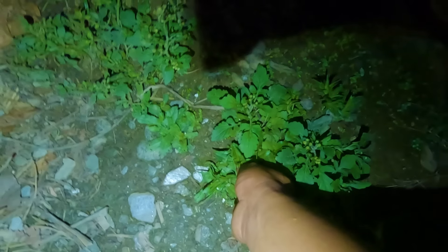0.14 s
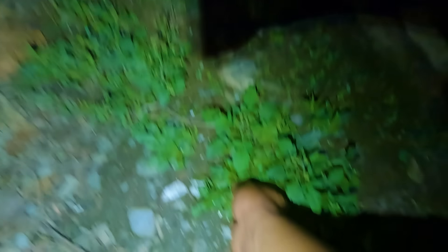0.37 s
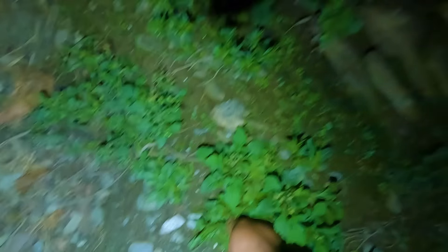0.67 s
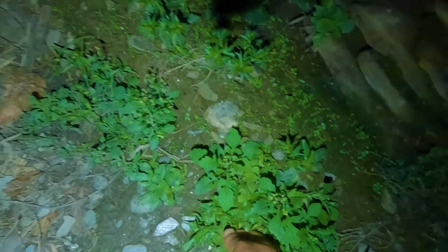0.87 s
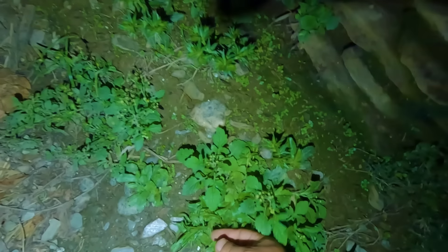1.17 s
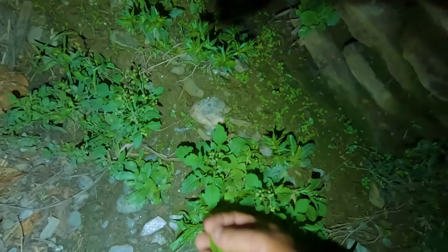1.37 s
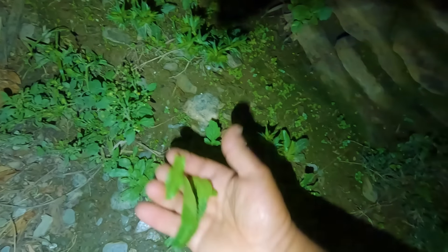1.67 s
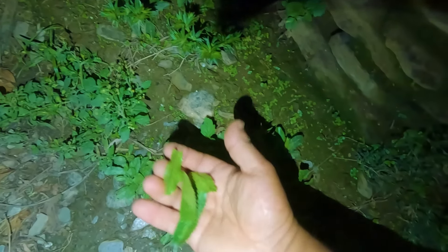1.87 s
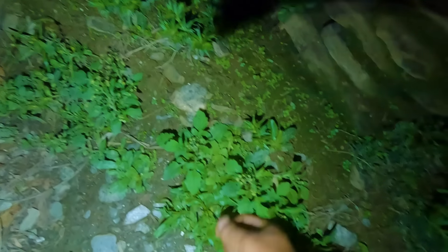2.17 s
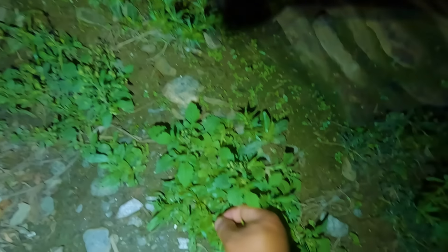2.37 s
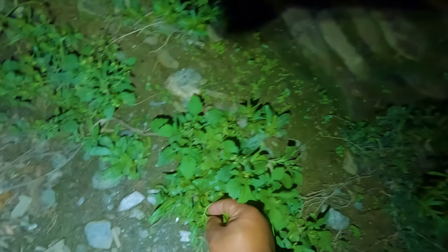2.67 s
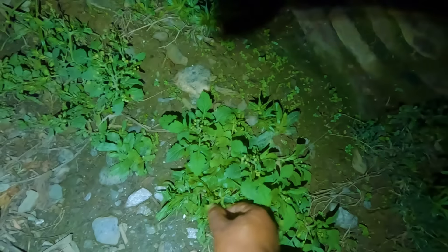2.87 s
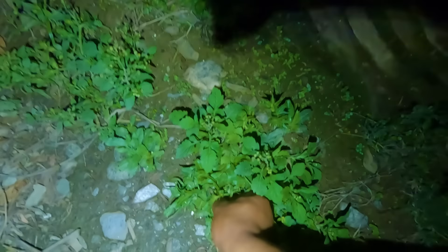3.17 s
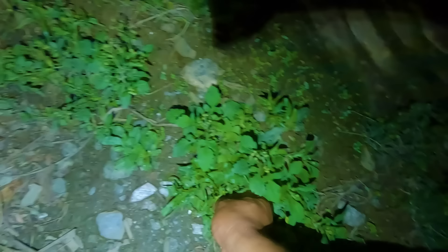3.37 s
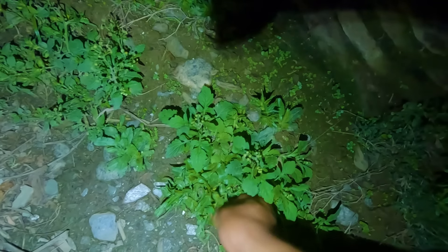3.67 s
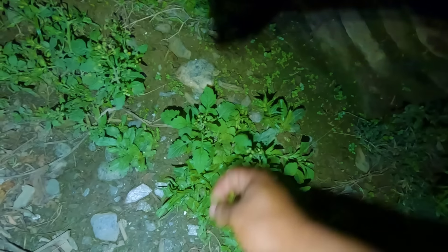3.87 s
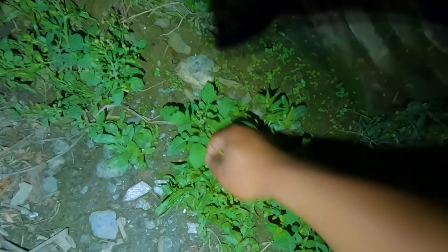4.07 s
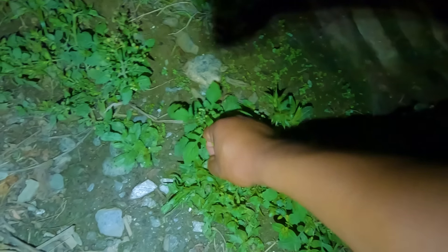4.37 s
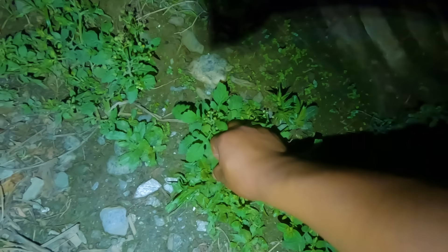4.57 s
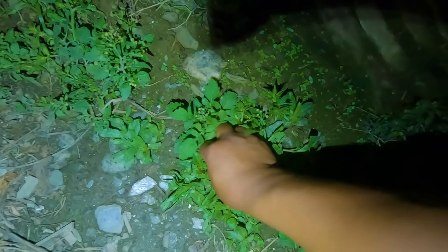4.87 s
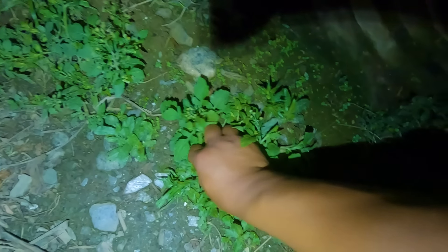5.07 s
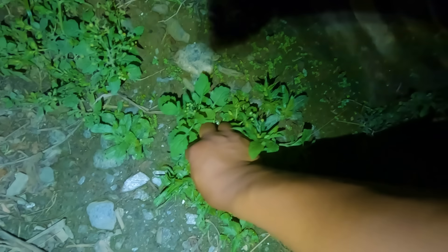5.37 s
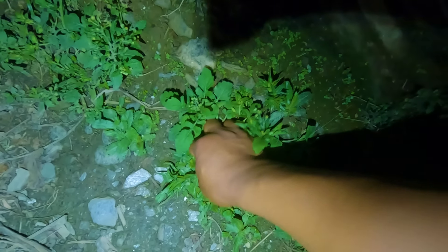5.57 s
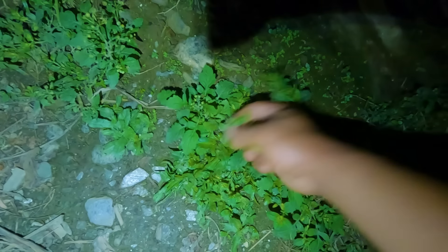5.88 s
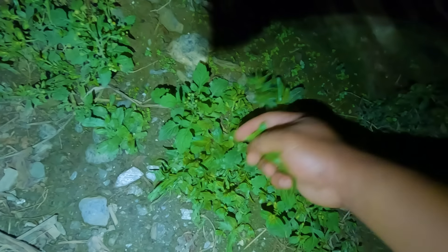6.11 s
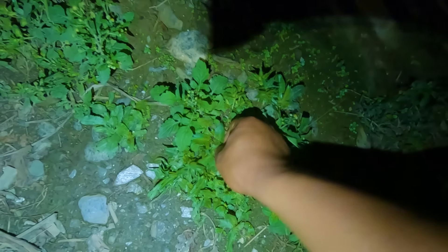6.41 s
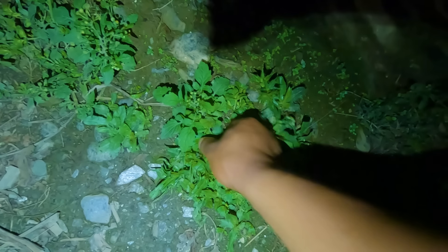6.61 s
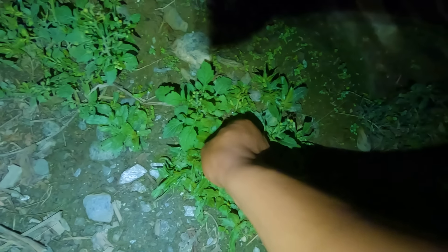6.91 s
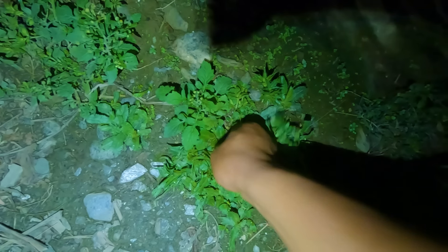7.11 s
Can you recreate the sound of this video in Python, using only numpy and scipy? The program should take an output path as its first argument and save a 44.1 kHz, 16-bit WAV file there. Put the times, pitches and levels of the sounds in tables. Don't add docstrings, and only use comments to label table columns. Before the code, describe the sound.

A continuous bright cricket chorus fills a quiet night, the steadiest near singer toward the left. Right by the handheld microphone, leafy plants are picked: dry rustles, tiny leaf flicks and ticks, and occasional sharp stem snaps with short woody thuds. The first half is sparse; the second is denser and crisper, with its strongest snap late. Faint low rumbles and bumps come from the holder moving; the open air adds little echo.

```python
import sys
import numpy as np
from scipy import signal
from scipy.fft import rfft, irfft, next_fast_len
from scipy.io import wavfile
from scipy.ndimage import uniform_filter1d, map_coordinates

SR = 44100
rng = np.random.default_rng(int(sys.argv[2]) if len(sys.argv) > 2 else 0)


def int16_out(signal):
    q = np.round(np.clip(np.atleast_2d(signal).T, -1, 1) * 32767)
    wavfile.write(sys.argv[1], SR, q.astype(np.int16))


def invert_db(x):
    u = np.asarray(x, float) / 20
    return 10 ** u


N = 319725


def unit(x):
    return x / np.sqrt(np.mean(x ** 2) + 1e-20)


def along(points, hz):
    f, v = np.transpose(points)
    return np.interp(np.log(hz + 1), np.log(f + 1), v)


def filtered(x, response):
    m = next_fast_len(N + 8192)
    return irfft(rfft(x, m) * response(np.fft.rfftfreq(m, 1 / SR)), m)[..., :N]


def resonance(centre_hz, width_hz):
    return lambda f: 1j * f * width_hz / (centre_hz ** 2 - f * f + 1j * f * width_hz)


def causal(points):
    def response(hz):
        cepstrum = irfft(along(points, hz) * np.log(10) / 20, 2 * len(hz) - 2)
        half = len(hz) - 1
        fold = np.r_[1, np.full(half - 1, 2), 1, np.zeros(half - 1)]
        return np.exp(rfft(cepstrum * fold))
    return response


def wobble(rate):
    knots = rng.standard_normal(int(N * rate / SR) + 4)
    return map_coordinates(knots, [np.arange(N) * rate / SR])


def place(seconds, shapes, pan_db):
    start = np.round(seconds * SR).astype(int)[:, None]
    at = (start + np.arange(shapes.shape[1])).clip(-1, N) % (N + 1)
    sides = []
    for side in (1, -1):
        panned = shapes * invert_db(side * pan_db / 2)[:, None]
        sides.append(np.bincount(at.ravel(), panned.ravel(), N + 1)[:N])
    return np.array(sides)


def ring(s, db, hz, t60, fall):
    t = np.arange(SR // 4) / SR
    cycles = np.reshape(hz, (-1, 1)) * t / (1 + fall * t)
    decay = invert_db(db[:, None] - 60 * t / np.reshape(t60, (-1, 1)))
    return place(s, decay * np.sin(2 * np.pi * cycles), np.zeros(len(s)))


def scatter(x, t60):
    t = np.arange(SR // 4) / SR
    own, shared = rng.standard_normal((2, len(t))), rng.standard_normal(len(t))
    tail = (own + 0.32 * shared) * invert_db(-60 * t / t60) * (1 - np.exp(-t / 0.0021))
    return signal.fftconvolve(x, tail / np.linalg.norm(tail[0]), axes=1)[:, :N]


# f/Hz, likeness/0-1
ALIKE = [(60, 0.44), (130, 0.63), (600, 0.15), (3000, 0.23), (7000, 0.99), (12000, 0)]


def pair(spectrum):
    def mid_side(hz):
        turn = np.arccos(np.clip(along(ALIKE, hz), 0, 1)) / 2
        return invert_db(along(spectrum, hz)) * [np.cos(turn), np.sin(turn)]
    mid, side = filtered(rng.standard_normal((2, N)), mid_side)
    return unit(np.array([mid + side, mid - side]))


# f/Hz, level/dB
NIGHT = [(60, -46), (110, -4.5), (170, 2), (400, -5.5), (800, -13), (1350, -8.5), (2200, -19.5),
         (3700, -16), (6200, -8.5), (7300, -9), (8300, -18.5), (10300, -34), (11600, -31), (14500, -26),
         (15400, -55)]


def night_hush():
    return invert_db(-69.5) * pair(NIGHT)


def stroke(db, start_hz, end_hz, overtone_db, rough, bend):
    u = np.arange(1400) / 1400
    hz = start_hz[:, None] - (start_hz[:, None] - end_hz) * u ** bend
    phase = 2 * np.pi * (np.cumsum(hz, axis=1) / SR + rng.random((len(db), 1)))
    swell = np.sin(np.pi * u ** .6) ** 1.6
    uneven = rng.standard_normal(hz.shape)
    for _ in range(2):
        uneven = uniform_filter1d(uneven, size=70, axis=1)
    note = np.sin(phase) + invert_db(overtone_db) * np.sin(2 * phase)
    return invert_db(db)[:, None] * swell * np.exp(rough * uneven) * note


def far_group(low_hz, span_hz, end_hz, count=16):
    pace, start, pitch, side, size = rng.random((5, count, 1, 1))
    period_s = .2 + .09 * pace
    s = period_s * (np.arange(38)[:, None] - start - 1) + .045 * np.arange(3)
    spread = lambda v: np.broadcast_to(v, s.shape).ravel()
    db = spread(-6 * size) + 1.8 * rng.standard_normal(s.size)
    hz = spread(low_hz + span_hz * pitch) + 40 * rng.standard_normal(s.size)
    pan_db = spread(3.4 + 6 * (side - .5))
    strokes = stroke(db, hz, end_hz, overtone_db=-34, rough=4.3, bend=1.671)
    direct = place(s.ravel(), strokes, pan_db)
    return unit(direct + scatter(direct, t60=1.0))


# t/s, level/dB
CHORUS = [(0.0, -49), (0.36, -49), (0.46, -49), (1.43, -48.5), (1.53, -50), (2.24, -50), (2.38, -50),
          (3.01, -48.5), (3.43, -49), (3.82, -48.5), (4.2, -50.5), (5.19, -50), (5.29, -50.5),
          (5.94, -49.5), (6.36, -50.5), (6.52, -49.5), (6.62, -50.5), (7.25, -50.5)]


def far_crickets():
    deep = far_group(low_hz=4870, span_hz=405.2, end_hz=3605)
    high = far_group(low_hz=5186, span_hz=471, end_hz=4484)
    s, db = np.transpose(CHORUS)
    swell_db = np.interp(np.arange(N) / SR, s, db)
    return invert_db(swell_db - swell_db.mean()) * (invert_db(-49.5) * deep + invert_db(-57.5) * high)


# start t/s, end t/s, f/Hz, level/dB, left-right/dB
THIN = [
    (1.75, 2.1, 6200, -76, -3),
    (3.28, 3.8, 6180, -75, -3),
    (1.38, 1.55, 1340, -69, 0),
    (1.21, 1.25, 920, -68, 0),
    (1.19, 1.3, 1620, -70, 0),
]


def thin_notes():
    t, out = np.arange(N) / SR, 0
    for start, end, hz, db, pan_db in THIN:
        fade = np.sin(np.pi * np.clip((t - start) / (end - start), 0, 1)) ** 0.28
        drifting_hz = hz + 15 * wobble(30)
        note = np.sin(2 * np.pi * np.cumsum(drifting_hz) / SR) * wobble(90) * invert_db(db)
        out = out + fade * note * invert_db([[pan_db / 2], [-pan_db / 2]])
    return out


def chirps(times, pattern):
    s, db, *first_db = np.transpose(times)[:, :, None]
    after, grow_db, hz, pan_db = np.transpose(pattern)
    db = db + grow_db + sum(first_db) * (np.arange(len(pattern)) == 0)
    chance = rng.standard_normal((len(times), len(pattern), 2))
    db = db + 1.1 * chance[..., 0]
    hz = hz + 40 * chance[..., 1]
    return np.reshape([s + after, db, hz, pan_db + 0 * s], (4, -1))


# t/s, level/dB, first stroke level/dB (relative)
STEADY = [(.089, -42.5, -4), (.412, -43, 1), (.682, -39.5, -1), (.949, -40.5, -2), (1.215, -39.5, -0.5),
          (1.481, -41, 2), (1.746, -41, -0.5), (2.012, -44, 2), (2.28, -42.5, 1), (2.544, -43, 2),
          (2.808, -44, 2), (3.072, -41.5, -4), (3.337, -42, 2.5), (3.603, -42, 0.5), (3.87, -46, -4),
          (4.135, -53, 2), (5.251, -45, 0), (5.519, -42, 1), (5.784, -43.5, -3), (6.056, -46, 0.5),
          (6.323, -46, 0), (6.591, -43, 2.5), (6.855, -44, 2), (7.12, -45.5, -1)]
# t/s, level/dB
SLOW = [(.229, -44), (.679, -42.5), (1.323, -46), (1.773, -39), (2.24, -45.5), (2.724, -42), (3.19, -43.5),
        (3.691, -43.5), (4.139, -41), (4.571, -43), (5.023, -40), (5.513, -40.5), (5.996, -45.5),
        (6.423, -47), (6.922, -42)]
# t/s, level/dB
FITFUL = [(.839, -45), (1.046, -42.5), (1.459, -47), (1.894, -43), (2.327, -41.5), (3.973, -43),
          (4.384, -45), (4.778, -44.5), (5.252, -41.5)]
# t/s, level/dB
LONE = [(.347, -54), (.865, -54), (.916, -52), (1.178, -44), (1.393, -53), (2.218, -48), (2.998, -48),
        (3.022, -40), (3.574, -44), (4.362, -46), (4.662, -42), (4.706, -49), (5.322, -40), (5.975, -41),
        (6.893, -42), (2.078, -38), (2.958, -55), (3.834, -46), (4.306, -43), (4.544, -47), (4.912, -52),
        (4.944, -39.5), (4.997, -44), (5.084, -45), (5.212, -43), (6.499, -43)]
# t/s (after its start), level/dB (relative), start f/Hz, left-right/dB
STEADY_CHIRP = [
    (.003, -1.5, 4950, 11.5),
    (.05, 1.5, 5100, 8),
    (.1, 2, 5110, 7),
]
SLOW_CHIRP = [
    (.002, -1.5, 5294, 3),
    (.043, 1, 5283, 2),
]
FITFUL_CHIRP = [
    (0, -1, 5230, 1.6),
    (.04, 0.32, 5185, 0.54),
]
LONE_CHIRP = [
    (0.00054, -4, 5130, 3.5),
]


def near_crickets():
    singers = [(STEADY, STEADY_CHIRP), (SLOW, SLOW_CHIRP), (FITFUL, FITFUL_CHIRP), (LONE, LONE_CHIRP)]
    s, db, hz, pan_db = np.hstack([chirps(times, pattern) for times, pattern in singers])
    strokes = stroke(db - 3.0, hz, end_hz=3850, overtone_db=-35.5, rough=1.6, bend=1.947)
    membrane = lambda f: 1.155 + 0.49 * resonance(5050, 400)(f)
    direct = filtered(place(s, strokes, pan_db), membrane)
    return direct + invert_db(-7) * scatter(direct, t60=0.13)


# f/Hz, level/dB
LUMPS = [(12, -3.5), (30, 2.5), (70, -9), (130, -21.5), (300, -72)]
# middle t/s, level/dB, half length t/s
SWAYS = [(0.624, -57.5, 0.047), (0.763, -74, 0.17), (.97, -79, 0.07), (1.917, -50.5, 0.066),
         (2.356, -72, .03), (3.176, -69.5, 0.097), (3.49, -76, 0.1), (4.547, -87, .1), (5.073, -78, 0.027),
         (5.382, -79, .08), (5.68, -61, 0.022), (6.404, -81, 0.054), (7.134, -60, 0.026)]
# t/s, level/dB, start f/Hz, t60/s
BUMPS = [
    (0.572, -44, 345, 0.038),
    (0.573, -46, 63.7, 0.32),
    (.574, -48.5, 148, 0.091),
    (1.094, -49, 350, 0.021),
    (1.281, -56, 369, 0.062),
    (2.363, -62, 1020, 0.047),
]


def handling():
    t = np.arange(N) / SR
    swell = invert_db(-79.5)
    for middle, db, half in SWAYS:
        swell = swell + invert_db(db) * np.exp(-((t - middle) / half) ** 2)
    rumble = swell * unit(pair(LUMPS) * invert_db(2.1 * wobble(8.3)))
    s, db, hz, t60 = np.transpose(BUMPS)
    bumps = ring(s, db, hz, t60, fall=1.8)
    return rumble * invert_db([[1.5], [-1.5]]) + bumps * invert_db([[2.5], [-2.5]])


# t/s, length t/s, crisp level/dB, dull level/dB (relative to crisp)
RUSTLE = [(0, 0.21, -63, -23), (0.273, 0.21, -67.5, -14.5), (0.538, 0.35, -71, -8.5),
          (0.807, 0.059, -59, -12), (0.98, 0.12, -66, -16.5), (1.153, 0.32, -68.5, -3),
          (1.519, 0.12, -60.5, -25), (2.152, 0.045, -58.5, -33), (2.21, 0.24, -65, -16.5),
          (2.521, 0.074, -66, -16.5), (2.682, 0.049, -61.5, -20.5), (2.845, 0.065, -58.5, -12),
          (3.001, 0.2, -63, -10), (3.24, 0.29, -66, -26), (3.798, 0.056, -56.5, -9.5),
          (3.918, 0.077, -65, -18.5), (4.141, 0.14, -54.5, -11), (4.314, 0.11, -58.5, -7.5),
          (4.421, 0.067, -60, -7.5), (4.538, 0.22, -56.5, -13), (4.83, 0.077, -57, -13),
          (4.952, 0.15, -59.5, -11), (5.136, 0.077, -60.5, -13), (5.244, .12, -58.5, -13.5),
          (5.428, 0.043, -59, -14.5), (5.517, 0.12, -62, -25), (5.688, 0.13, -56, -6.5),
          (5.852, 0.089, -52, -10.5), (5.988, 0.11, -60.5, -10.5), (6.142, 0.05, -63.5, -2.5),
          (6.24, 0.018, -65, -25), (6.308, 0.05, -58.5, -12), (6.4, 0.049, -65, -18),
          (6.464, 0.057, -57.5, -8), (6.562, 0.057, -61, -11.5), (6.675, 0.12, -59, -18.5),
          (6.865, 0.069, -59, -19), (6.966, 0.06, -66, -19), (7.086, 0.13, -64, -11.5),
          (7.196, .1, -57, -11)]


def moves():
    s, length, crisp_db, dull_db = np.transpose(RUSTLE)
    grip_s, let_go_s = 0.026, 0.026
    t = np.arange(0, N, 32)[:, None] / SR - s
    shape = np.exp(np.minimum(t, 0) / grip_s - np.maximum(t - length, 0) / let_go_s)
    middle_db = crisp_db + 0.31 * dull_db - 4
    parts_db = [crisp_db + dull_db, middle_db, crisp_db]
    return [np.repeat(np.sqrt(shape ** 2 @ invert_db(db) ** 2), 32)[:N] for db in parts_db]


# f/Hz, level/dB
LEAF = [(200, -23), (380, -11.5), (780, -30.5), (1050, -13), (1500, -11.5), (3600, -11.5), (5800, -20),
        (7200, -13.5), (8600, -31), (10300, -32.5), (11500, -42), (14200, -39.5), (16500, -75)]


def rustle(count=11000):
    s, octave, side = rng.random((3, count))
    hz, t = 900 * 2 ** (3.75 * octave[:, None]), np.arange(120) / SR
    size_db = np.minimum(5 * rng.exponential(size=(count, 1)), 14)
    grains = invert_db(size_db) * np.sqrt(hz) * np.exp(-t * hz / 3.7) * np.sin(2 * np.pi * hz * t)
    grains = place(s * N / SR, grains, 8 * (side - .5))
    flicks = filtered(grains, lambda f: invert_db(along(LEAF, f)) * np.sqrt(f / 3000))
    leaves = 0.63 * unit(flicks) + 0.85 * pair(LEAF)
    leaves = leaves * invert_db(1.38 * wobble(110) + 0.74 * wobble(30))
    crisp = filtered(leaves, lambda f: 1 / (1 + (4600 / (f + 1)) ** 8))
    dull = filtered(leaves, lambda f: 1 / (1 + (f / 1900) ** 6))
    out = 0
    for gain, part in zip(moves(), (dull, leaves - crisp - dull, crisp)):
        clumped = part * invert_db(1.73 * wobble(40) + 1.66 * wobble(14))
        out = out + gain * unit(clumped)
    return out


def cracks(s, db, mid_db, pan_db, life, blow, width_hz):
    t = np.arange(500) / SR
    breaks = invert_db(-60 * t / life) * rng.standard_normal((len(s), len(t))) * 0.42
    burst = breaks + blow * (t == 0)
    bright = filtered(place(s, invert_db(db)[:, None] * burst, pan_db), resonance(7500, width_hz))
    middle = place(s, invert_db(db + mid_db)[:, None] * burst, pan_db)
    middle = filtered(middle, lambda f: resonance(3060, 4000)(f) ** 2)
    return invert_db(8.0) * (bright + middle)


# f/Hz, level/dB
HOUSING = [(90, -27), (200, -13), (7300, 6.5), (8500, -9.5), (10600, -7.5), (12200, -20.5), (16000, -12)]
# f/Hz, width f/Hz, level/dB (relative)
STEMS = [
    [(1150, 110, -9), (2160, 190, 6.5), (2750, 220, -4), (3800, 240, 4), (4390, 250, 1), (5450, 380, 5),
     (6930, 440, 7)],
    [(2300, 460, -8), (6900, 500, -8)],
    [(1400, 450, -5), (2200, 530, 9), (4030, 220, -3), (4650, 470, 9), (6830, 210, 9.5), (8960, 470, 3.5)],
    [(780, 170, -1), (1660, 400, -5), (2240, 530, 4), (4950, 190, -9), (6700, 310, 0), (7200, 450, 3)],
    [(1400, 650, -35), (3020, 1800, -14), (4950, 460, 1), (6400, 500, 1), (9700, 1000, -6.5)],
    [(1850, 460, -21), (2900, 420, -10), (4380, 190, -1), (5200, 230, 2), (5900, 460, 4.5),
     (6700, 550, 5.5)],
    [(3500, 530, 1), (6950, 1340, 7), (8800, 367, -28)],
    [(3540, 270, 1), (5700, 600, 9), (7140, 740, 0), (9200, 590, -15)],
]


def stems(s, db):
    rows = []
    for at, level, stem in zip(s, db, STEMS):
        rows += [(at, level + rel, hz, width) for hz, width, rel in stem]
    at, level_db, hz, width = np.array(rows).T
    level_db = level_db - 3 + 20 * np.log10(width / 500) - along(HOUSING, hz)
    return ring(at, level_db, hz, np.log(1000) / (np.pi * width), fall=0)


# t/s, peak level/dB, mid crack level/dB (relative), finger knock level/dB (relative), knock
# f/Hz
SNAPS = [
    (0.7143, -25.5, -2, -35, 940),
    (0.7249, -33, 3, -27, 961),
    (0.784, -29.5, 9.5, -7, 780),
    (0.822, -28.5, -2, -15, 980),
    (3.7113, -23, -6.5, -9, 770),
    (5.678, -15, -9, -15.5, 748),
    (7.1904, -17.5, -5, -15, 1070),
    (7.1934, -32.5, 14.5, -5, 926),
]
# low thud level/dB, hollow note level/dB (relative)
THUDS = [
    (-36, -47),
    (-40, -42),
    (-6.5, -14),
    (-12, -30),
    (-9, -12),
    (-15.5, -19.5),
    (-21, -31),
    (-8, -16),
]
# f/Hz, level/dB (relative), t60/s, sag/per s, t/s (after the snap)
PLANT = [
    (324, 2, 0.047, 6.4, 0.00014),
    (470, -2, 0.037, 0.85, .0003),
    (274, -0.5, 0.047, 1, 0.0113),
]
# t/s, peak level/dB, f/Hz
TAPS = [(0.2026, -52, 3180), (0.2857, -59, 1330), (0.3391, -48.5, 1780), (0.4184, -54, 3440),
        (0.4614, -51, 3000), (2.2353, -59, 3570), (2.2523, -48, 2700), (2.3042, -48, 2850),
        (2.4009, -50, 3520), (2.8694, -43, 3470), (2.9233, -39, 3260), (3.2849, -46, 3600),
        (3.7878, -40, 1930), (3.8092, -41, 2060), (3.8421, -37.5, 1720), (4.2158, -52, 2070),
        (4.347, -40, 2170), (4.5052, -45.5, 2520), (4.61, -42.5, 2700), (4.6483, -46, 3430),
        (4.9826, -49, 2650), (5.2496, -46, 2880), (5.4345, -52, 2720), (5.8585, -45, 3270),
        (5.8795, -40, 3420), (6.1185, -54, 2670), (6.1488, -43, 1420), (6.897, -50, 2070)]
# t/s, peak level/dB, mid crack level/dB (relative)
TICKS = [(0.1312, -47, -1), (0.3402, -63, -7), (0.6744, -55, 8), (1, -54, 6), (1.046, -49, -11),
         (1.28, -58, 10), (1.409, -42, -27), (1.5278, -54, -15), (1.5575, -36, -10), (1.585, -38, -13),
         (2.148, -39, -25), (2.157, -35, -31), (2.161, -43, -25), (3.949, -48, -20), (2.282, -40, -14),
         (2.3052, -39.5, 5), (2.3367, -42, -28), (2.842, -52, 5), (2.9227, -51, 9), (3.118, -41, -26),
         (3.1714, -37.5, -6), (3.788, -49, 5), (3.808, -34.5, -2.5), (3.845, -41, 3), (3.955, -41, -28),
         (4.348, -35, -6), (4.7076, -33, -6), (5.139, -39.5, -0.5), (5.463, -33.5, -32), (5.912, -32, -23),
         (6.306, -40, -25), (6.407, -36, -54), (6.5267, -38.5, -6), (6.609, -55, 10), (6.791, -54, 10),
         (7.134, -39.5, -8),
         (0.0169, -53, -14), (0.0308, -42.5, -11), (0.0837, -38, -20), (0.1565, -60, -14),
          (0.1795, -63, -15), (1.1528, -48, -21), (1.3226, -44, -24), (1.3758, -42, -16), (1.485, -42, -22),
          (1.507, -53, -21), (1.5374, -39, -21), (1.701, -53, -28), (1.7365, -49, -18),
          (2.0962, -46.5, -18), (2.2458, -44, -12), (2.545, -51, -20), (3.1325, -36, -24),
          (3.2784, -51, -10), (3.4985, -49, -26), (4.0577, -48, -8), (4.0735, -41.5, -4),
          (4.2338, -43, -14), (4.3624, -37, -3), (4.3744, -48, -14), (4.5326, -51, -18), (4.5446, -43, -2),
          (4.568, -40, 0), (4.6618, -40, -5), (4.6818, -50, -18), (4.6937, -50, -18), (4.8314, -52, -18),
          (5.1663, -45, -18), (5.5172, -41.5, -21), (5.5832, -49, -22), (5.6241, -48, -21),
          (5.8591, -38, -18), (5.878, -41, -18), (5.91, -44, -18), (5.9399, -51, -18), (6.0616, -44, -21),
          (6.099, -47, -20), (6.1574, -46, -18), (6.2841, -51, -18), (6.322, -36.5, -23), (6.331, -37, -10),
          (6.356, -45, -18), (6.3776, -43, -27), (6.4313, -52, -24), (6.6034, -41.5, -18),
          (6.6623, -49, -20), (6.7072, -44, -20), (6.8736, -41, -24), (6.914, -46, -10), (6.9336, -41, -23),
          (6.985, -48, -10), (7.0668, -46, -18)]


def picking():
    s, db, mid_db, knock_db, knock_hz = np.transpose(SNAPS)
    thud_db, hollow_db = np.transpose(THUDS)
    s = s + .0003
    snaps = cracks(s, db - 4, mid_db, np.full(len(s), 1.2), life=0.011, blow=1.52, width_hz=4600)
    snaps = snaps + stems(s, db)
    snaps = snaps + ring(s, db + knock_db + 12.5, 1.18 * knock_hz, 0.0054, fall=1.2)
    for hz, rel_db, t60, fall, after in PLANT:
        snaps = snaps + ring(s + after, db + thud_db + rel_db, hz, t60, fall)
    snaps = snaps + ring(s, db + hollow_db + 5, hz=658, t60=0.034, fall=0)

    s, db, hz = np.transpose(TAPS)
    taps = ring(s + .0011, db - 1, hz, t60=15 / hz, fall=0)

    s, db, mid_db = np.transpose(TICKS)
    pan_db = 3 * rng.standard_normal(len(s))
    ticks = cracks(s, db, mid_db, pan_db, life=0.012, blow=0.38, width_hz=2700)

    close = snaps + taps + ticks
    echoes = invert_db(-22) * scatter(close, t60=.06)
    late = lambda f: np.exp(np.outer([1, -1], 1j * np.pi * f * 2.4e-5))
    return filtered(close + echoes, lambda f: causal(HOUSING)(f) * late(f))


def scene():
    background = night_hush() + far_crickets() + thin_notes() + near_crickets()
    return background + handling() + rustle() + picking()


def low_pass(x):
    return signal.sosfilt(signal.butter(12, 16420, fs=SR, output="sos"), x)


# f/Hz, level/dB
PORTS = [(60, 0), (300, -3.5), (700, -3.5), (1500, 2.5), (6500, -2), (9000, 11.5), (15000, 13)]


def record(dry):
    def response(f):
        colour = invert_db(np.outer([.5, -.5], along(PORTS, f)))
        return colour / np.sqrt(1 + (f / 15000) ** 30)
    mix = filtered(dry, response)
    return low_pass(mix)


dry = scene()
out = record(dry)
int16_out(out)
```